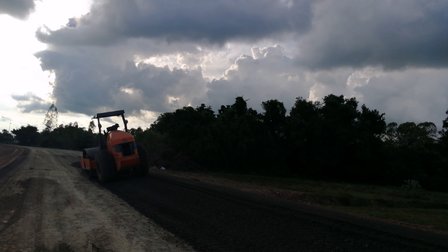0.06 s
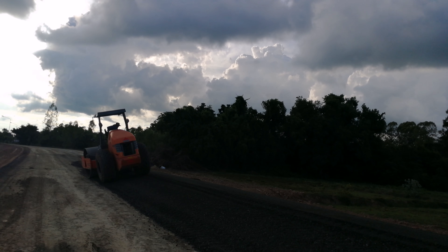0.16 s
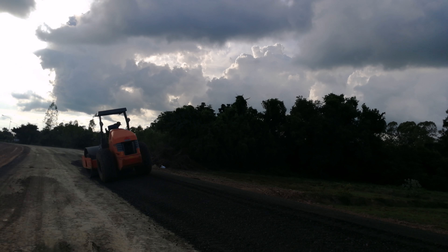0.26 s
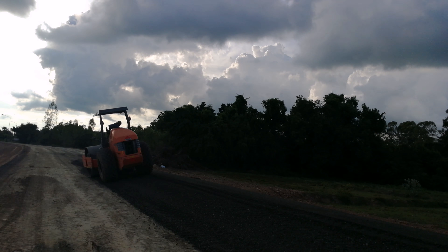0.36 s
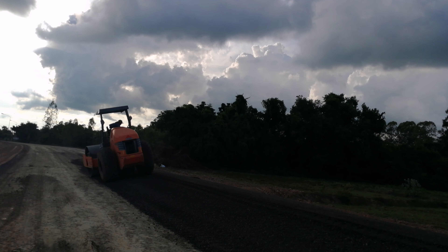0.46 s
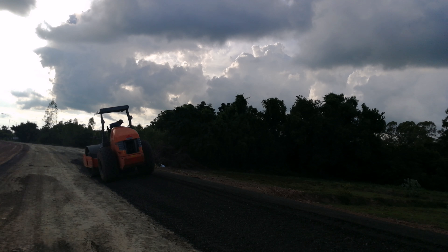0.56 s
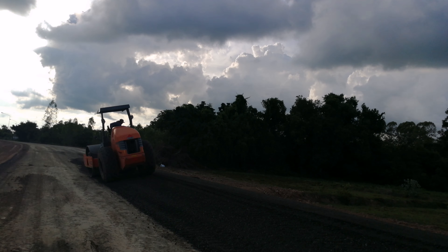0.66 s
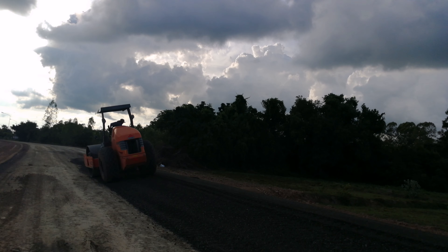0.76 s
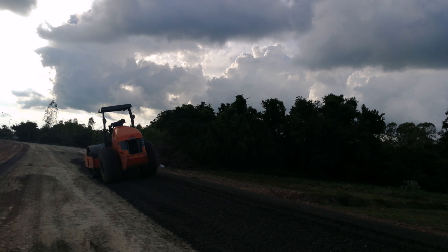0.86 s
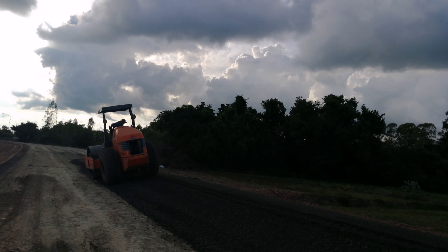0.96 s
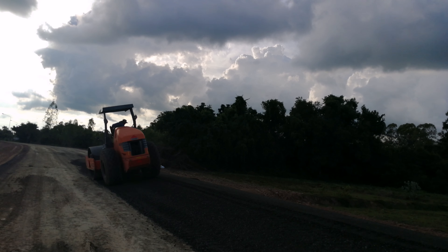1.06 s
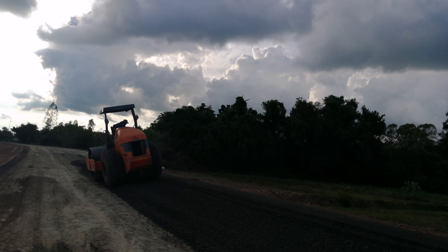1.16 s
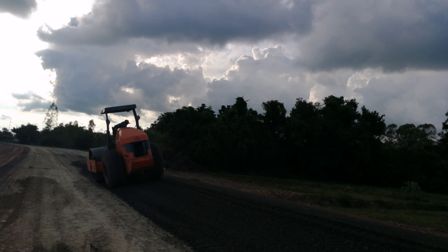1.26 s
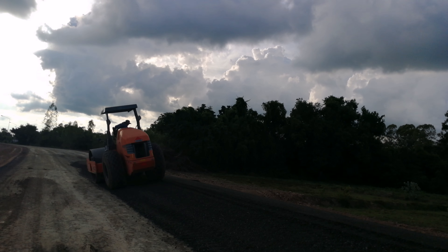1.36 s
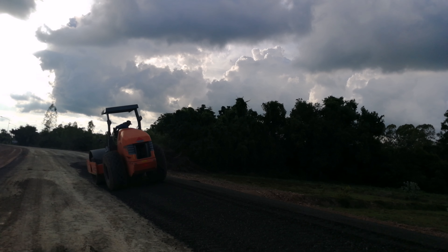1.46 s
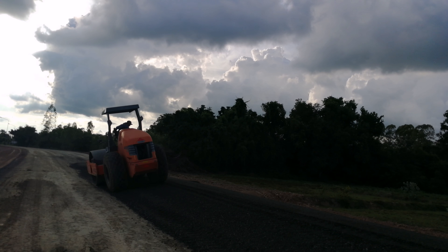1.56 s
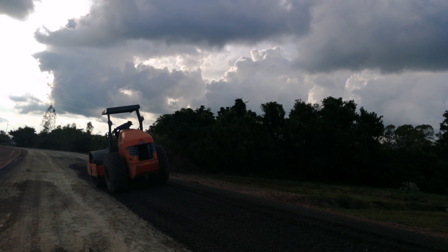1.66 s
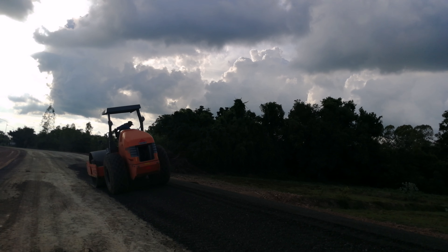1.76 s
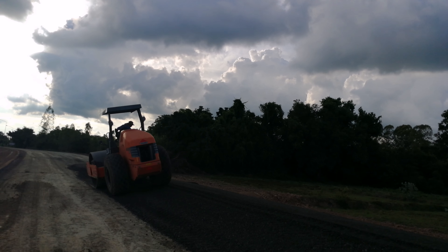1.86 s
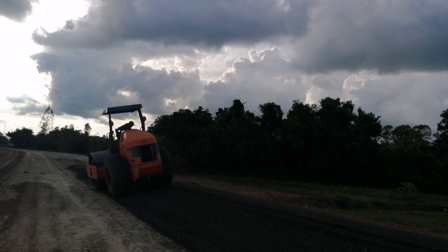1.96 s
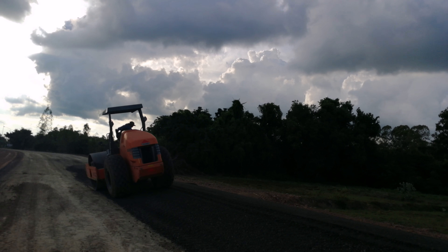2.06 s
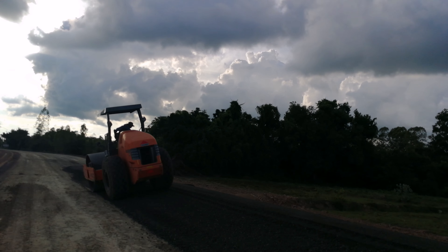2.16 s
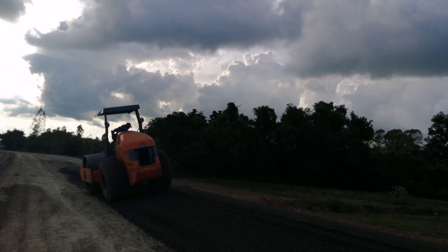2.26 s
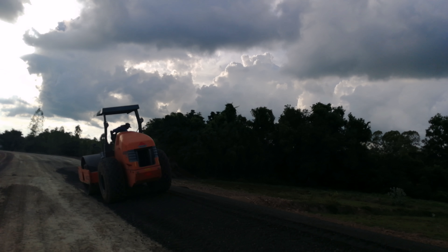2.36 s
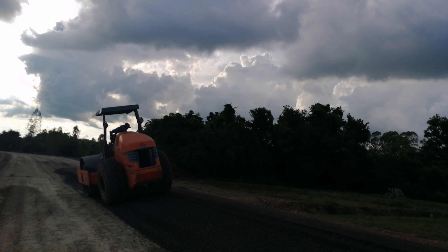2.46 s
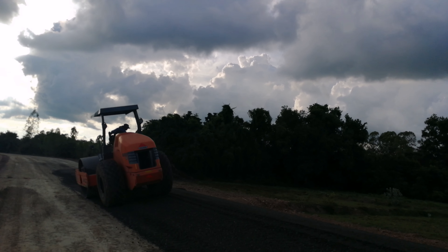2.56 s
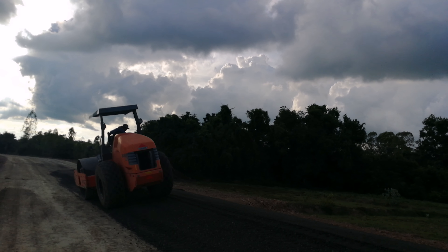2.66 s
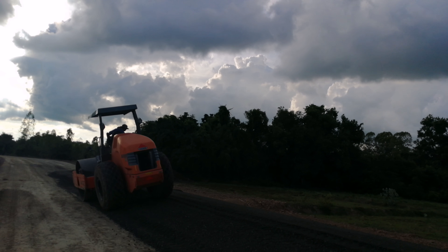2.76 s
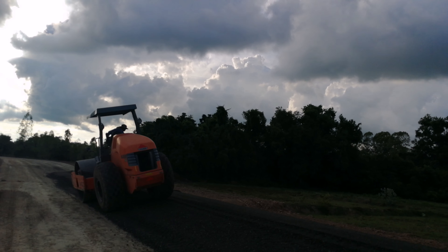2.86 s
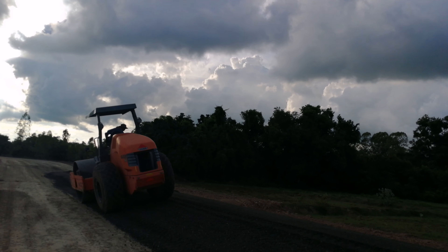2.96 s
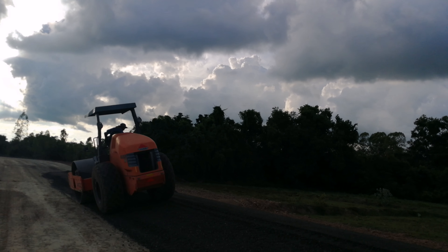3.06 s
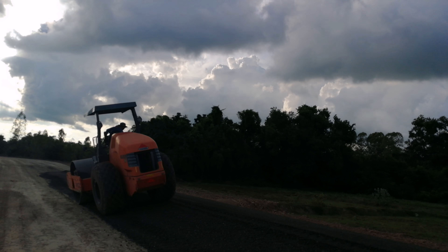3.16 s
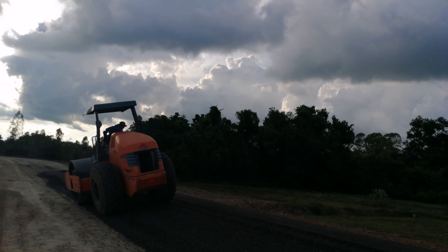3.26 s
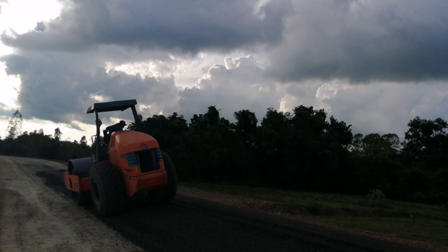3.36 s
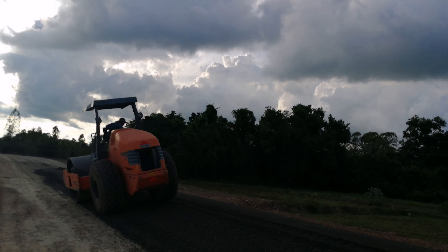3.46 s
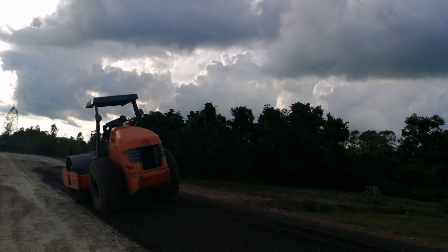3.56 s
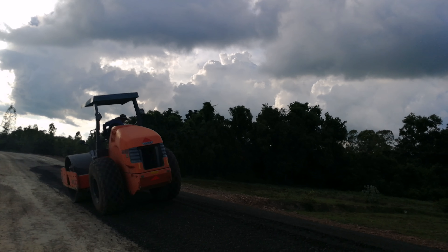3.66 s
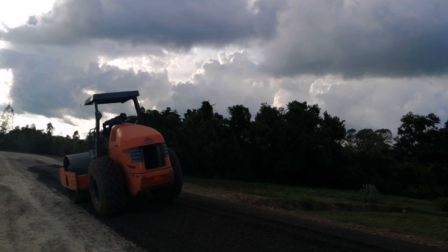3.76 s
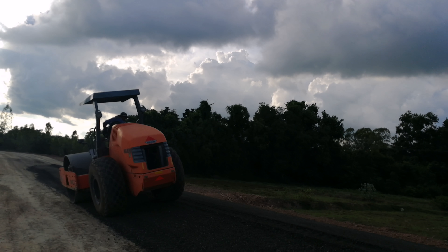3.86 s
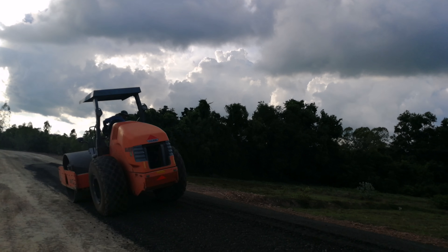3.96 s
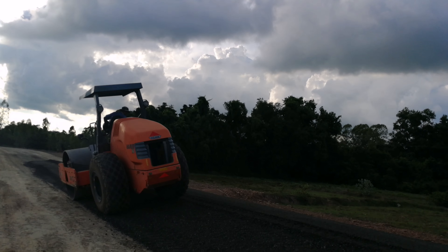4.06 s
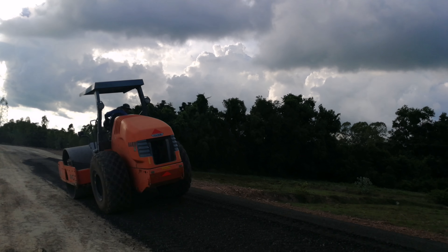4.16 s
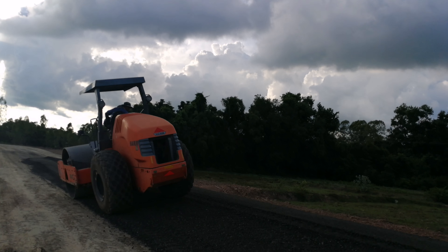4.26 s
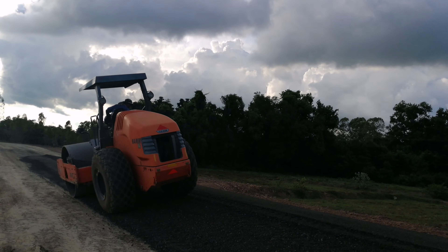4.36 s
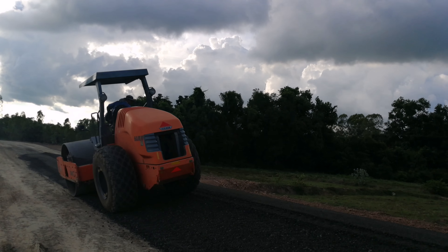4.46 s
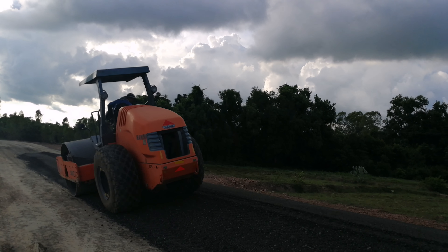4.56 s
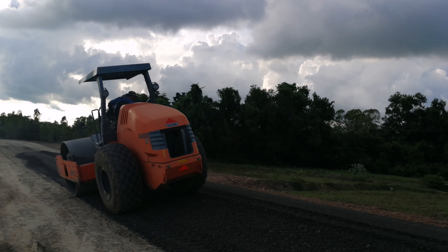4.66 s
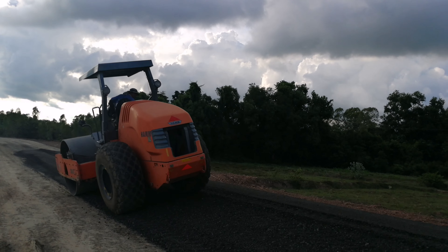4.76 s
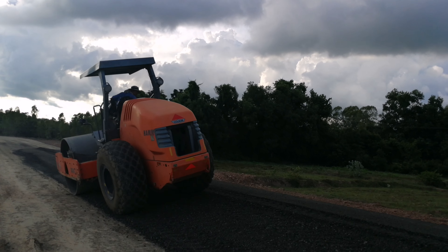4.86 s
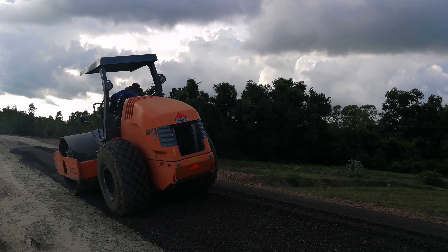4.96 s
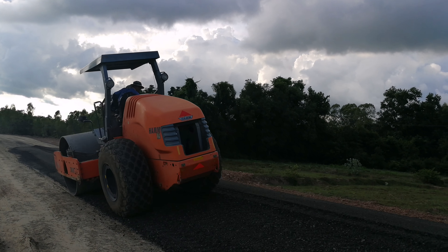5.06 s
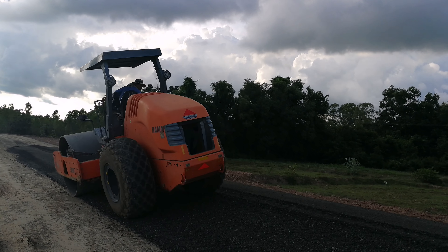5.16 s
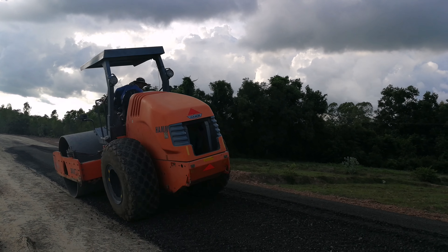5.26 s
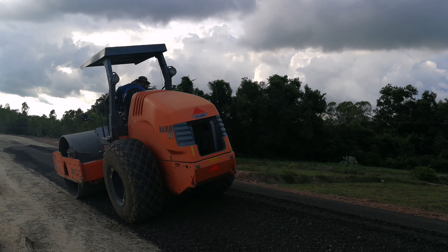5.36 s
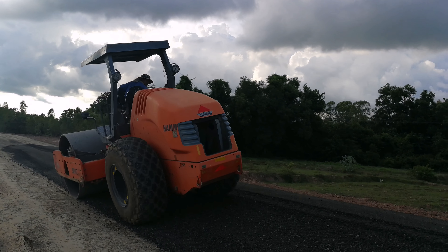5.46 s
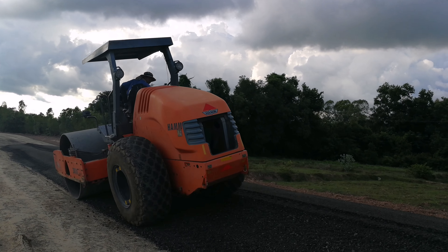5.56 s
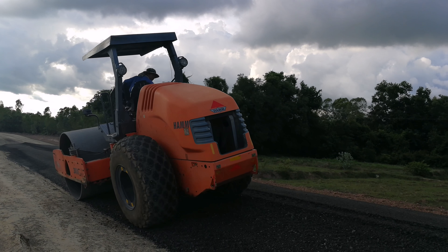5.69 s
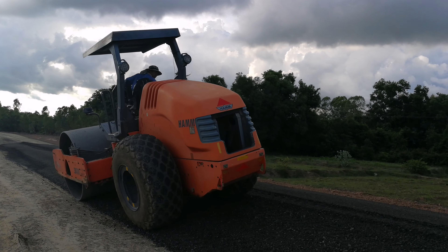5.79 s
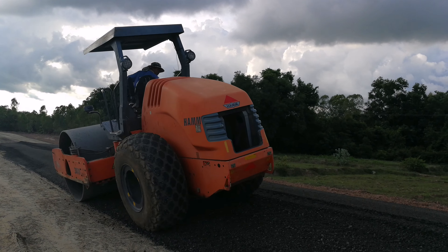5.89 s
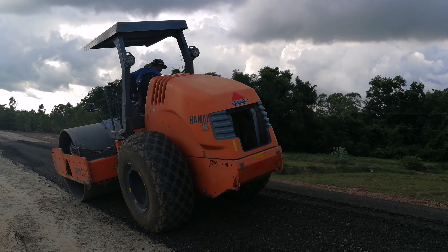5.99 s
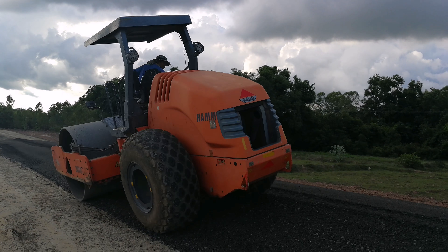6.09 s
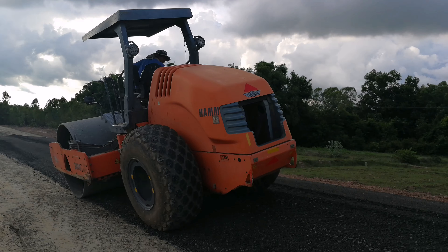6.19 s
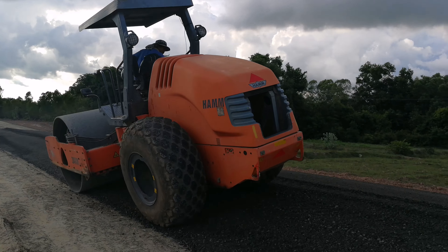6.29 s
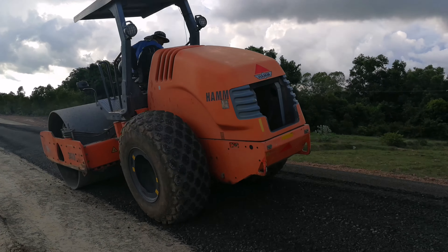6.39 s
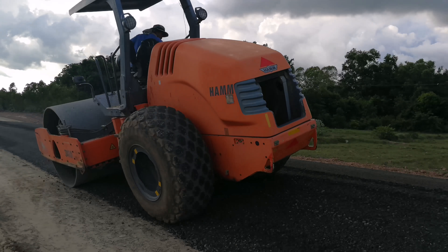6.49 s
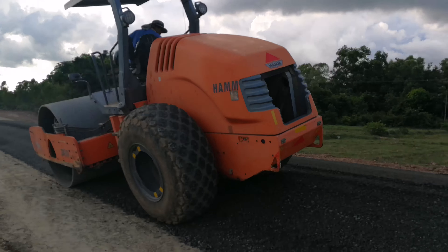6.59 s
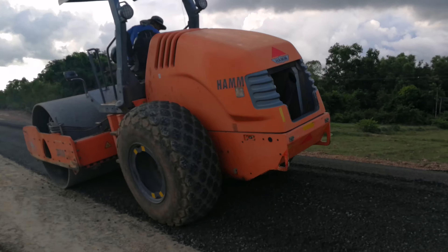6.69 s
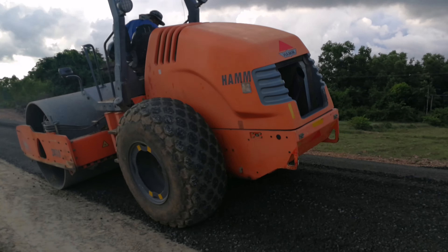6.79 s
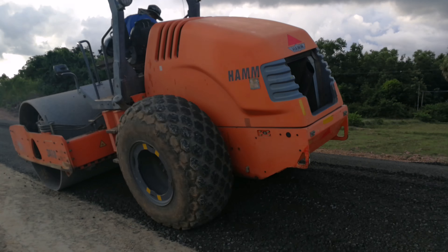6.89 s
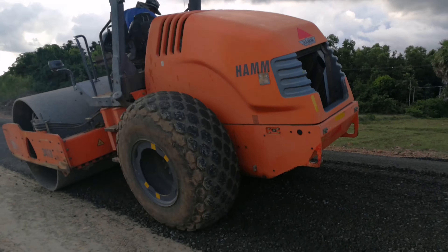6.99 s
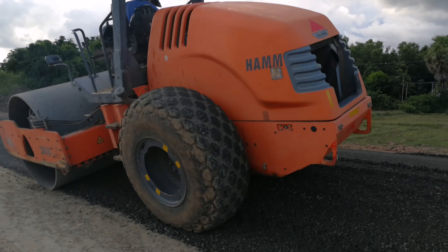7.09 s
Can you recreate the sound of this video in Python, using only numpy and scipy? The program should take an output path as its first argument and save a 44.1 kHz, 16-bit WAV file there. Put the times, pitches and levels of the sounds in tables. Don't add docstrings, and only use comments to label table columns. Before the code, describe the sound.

Steady low engine hum under broad, clattering fan noise, swelling gradually as a heavy roller approaches outdoors, with faint gritty jolts and panel buzzes.

```python
import sys
import numpy as np
from scipy import signal
from scipy.fft import rfft, irfft
from scipy.io import wavfile
from scipy.ndimage import uniform_filter1d

SR = 44100
rng = np.random.default_rng(int(sys.argv[2]) if len(sys.argv) > 2 else 0)


def ratio_of_db(decibels):
    return 10 ** (np.asarray(decibels, float) / 20)


def waveform_to_disk(signal):
    frames = np.transpose(np.atleast_2d(signal))
    scaled = np.clip(frames, -1, 1) * 32767
    samples = np.round(scaled).astype(np.int16)
    wavfile.write(sys.argv[1], SR, samples)


N = 314433
FRAME = 1024


def read(table, at):
    places, *columns = np.transpose(table)
    return np.array([np.interp(at, places, column) for column in columns])


def by_hz(table, hz):
    table = np.array(table, float)
    return read(np.c_[np.log(table[:, 0]), table[:, 1:]], np.log(hz + 1))


def unit(x):
    return x / np.sqrt(np.mean(np.abs(x) ** 2))


def walk(rate_hz):
    hold = int(SR / rate_hz)
    steps = np.repeat(rng.standard_normal(N // hold + 1), hold)
    return unit(uniform_filter1d(uniform_filter1d(steps, hold), hold)[:N])


def bump(t, at, length):
    return np.exp(-((t - at) / length) ** 2)


def resonance(hz, centre_hz, width_hz):
    return 1 / (1 + (2 * (hz[:, None] - centre_hz) / width_hz) ** 2)


def levels(t, rows):
    # start_s, gain_db
    approach = [(0, -1), (1, -0.2), (2, 1.5), (2.8, 2.5), (3.6, 4), (4.4, 5), (5.2, 7), (5.8, 7.5),
                (6.2, 9), (7.13, 9)]
    rise_db = read(approach, t)[0]
    return np.array([db + share * rise_db + wander_db * walk(rate_hz)
                     for db, share, wander_db, rate_hz in rows])


def engine(t):
    # level_db at the start, share of the approach (1 = all of it), wander_db, wander_rate_hz
    steady_tones = [
        (-34, 0.14, 0.67, 3.75),
        (-44.5, 1.0, 0.5, 5.1),
        (-44, -.1, 2, 5.1),
        (-51.5, 0, 3, 2.4),
        (-61.5, 2.03, 2.5, 4.99),
        (-43, 0.58, 0.7, 6.6),
    ]
    # peak_s, length_s, level_db
    tone_swells = [
        [(.1, .35, -2), (3.3, 0.16, 1.5), (3.75, .3, -1), (4.35, 0.14, 1.5), (5.2, 0.19, 2)],
        [(3.4, .5, 1), (4.95, .1, 3), (5.6, 0.49, -3), (6.3, .2, 0.5), (6.8, .15, -4)],
        [(2.6, .15, -9), (2.95, .15, 2), (4.1, .2, 5.5), (4.8, .2, 8), (5.9, .8, -9)],
        [(3.3, 1, -1)],
        [(4.9, .3, 4), (5.85, 0.18, 4.5), (6.3, 0.11, -6), (6.95, .3, 5.5)],
        [(.6, .8, 2.5), (1.65, .15, -5), (2.1, .15, 7.5), (3.4, 0.79, -8), (5.1, .2, 3.5), (5.35, 0.1, -1.5),
         (5.6, 0.16, 3.5), (6.35, .15, -2.5), (6.85, 0.2, 5)],
    ]
    # multiple of crank speed, level_db against the drone
    weak_orders = [(1, -40), (3, -62), (6, -28), (7, -31), (15, -21.5), (16, -30), (17, -24.5), (30, -38)]
    crank_hz, blade_hz = 38.8, 326.2
    crank = np.cumsum(crank_hz * (1 + 0.00091 * walk(3.105))) * 2 * np.pi / SR
    swells = [sum(db * bump(t, at, length) for at, length, db in rows) for rows in tone_swells]
    drone_db, firing_db, fifth_db, ninth_db, eighteenth_db, blade_db = levels(t, steady_tones) + swells

    tones = ratio_of_db(drone_db + 1.1 * walk(20)) * np.sin(4 * crank)
    tones = tones + ratio_of_db(firing_db + 3.0 * walk(14)) * np.sin(2 * crank)
    for order, db in [(5, fifth_db), (9, ninth_db), (18, eighteenth_db)]:
        tones = tones + ratio_of_db(db) * np.sin(order * crank)
    for order, db in weak_orders:
        wobble = 1.45 * walk(4)
        tones = tones + ratio_of_db(drone_db + db + 3.8 * walk(4.1)) * np.sin(round(order) * crank + wobble)

    blade_phase = np.cumsum(blade_hz * (1 + 0.00407 * walk(6))) * 2 * np.pi / SR
    blade = ratio_of_db(blade_db + 2.45 * walk(15)) * np.sin(blade_phase)
    return np.sqrt(2) * (tones + blade), crank


def roar(t, crank, shake_db):
    # pitch_hz, level_db per Hz
    colour = [(20, -25), (45, -5), (110, 2), (220, -3), (340, 4), (415, -6.5), (650, -3.5), (1500, -8.5),
              (3200, -7.5), (3900, -13.5), (7200, -17), (9600, -20.5), (11000, -26), (12700, -32.5),
              (15000, -36.5)]
    # pitch_hz, width_hz,
    # level_db against the roar
    smears = [(321.2, 40, -23), (655, 22, -19.5), (851, 50, -21.5), (980, 30, -18.5), (1040, 25, -27.5),
              (1643, 22, -24), (1956, 80, -20), (2958, 63, -20)]
    top_hz, roar_db = 15140, -28
    hz = np.fft.rfftfreq(N, 1 / SR)
    clatter = 1 / (1 + (1800 / (hz + 1)) ** 2)
    throb = ratio_of_db(0.43 * np.cos(2 * crank) + shake_db)
    steady = rng.standard_normal(N)
    throbbing = unit(throb * rng.standard_normal(N))
    mix = np.sqrt(1 - clatter) * rfft(steady) + np.sqrt(clatter) * rfft(throbbing)
    noise = unit(irfft(mix * ratio_of_db(by_hz(colour, hz)[0]) * (hz < top_hz), N))
    for pitch_hz, width_hz, db in smears:
        phase = 2 * np.pi * pitch_hz * t
        noise = noise + ratio_of_db(db) * (walk(width_hz) * np.cos(phase) + walk(width_hz) * np.sin(phase))
    return noise * ratio_of_db(roar_db)


def load_shake(t):
    # peak_s, swell_db, length_s
    crunches = [(0.545, -1, .04), (1.06, 1.5, 0.036), (2.002, 1, 0.045), (2.448, 1.5, 0.027),
                (4.074, 2, 0.064), (4.623, 1, 0.026), (4.91, 1, 0.018), (6.015, 3, 0.0092),
                (6.066, 1.5, 0.026), (6.553, -0.5, .012), (6.91, 4, 0.026)]
    shake_db = 0.19 * walk(8) + 0.66 * walk(21.98) + 0.5 * walk(50)
    return shake_db + sum(db * bump(t, at, length) for at, db, length in crunches)


def roar_swell(t, hz, s):
    # level_db at the start, share of the approach (1 = all of it), wander_db, wander_rate_hz
    parts = [
        (-4, 0.65, 0.8, 8),
        (1.15, 0, 0.6, 8),
        (-5.5, 1.2, -0.32, 5),
        (-4.5, .95, 0.4, 4),
    ]
    part_hz = [90, 280, 1200, 6000]
    bands = np.array([np.interp(s, t, db) for db in levels(t, parts)])
    patches = rng.standard_normal((len(hz), len(s)))
    patches = uniform_filter1d(uniform_filter1d(patches, size=5, axis=0), size=24, axis=1)
    return ratio_of_db(by_hz(np.c_[part_hz, bands], hz).T) * ratio_of_db(1.0 * unit(patches))


def bodywork(hz, s, near):
    # pitch_hz, width_hz, far_db, near_db
    panels = [(3700, 1070, 1.5, 0), (2403, 630, 6, 4.5), (2927, 290, 2.5, -13.5), (4560, 500, 3, 6),
              (7760, 1040, 6.5, -1.5), (9120, 400, 1.5, 3.5)]
    # peak_s, length_s, pitch_hz,
    # width_hz, level_db
    flares = [(0.01, 1.6, 304, 46, 4.5), (6.8, 0.9, 260, 38, 10), (6.05, .15, 250, 30, 6),
              (6.95, .3, 298, 25, 7), (5.3, .4, 830, 55, -3), (6.8, .15, 1110, 50, 5), (.7, 1, 1180, 60, -5),
              (6.4, .15, 290, 60, 5), (3.5, .8, 655, 25, 4), (2.7, .35, 9000, 8000, 1),
              (7.05, .15, 11000, 6000, 2), (4.33, 1.33, 660, 20.5, 8.5), (7.3, 0.47, 780, 33, 10),
              (0.01, 0.62, 1000, 230, 4), (1.52, 1.17, 962, 87, 11), (3.3, 0.46, 900, 62, 1),
              (4.2, 1.24, 996, 97, 7), (0.34, 1.1, 1650, 40, 11.5), (3.1, 0.93, 1650, 38, 7.5),
              (5.5, 1.7, 1540, 120, 4), (5.65, 0.61, 3400, 900, -2), (7.15, 1.1, 2930, 90, 17),
              (0.9, 1.27, 587, 71, -14), (0.78, 0.84, 1040, 48, 13.5), (7.5, 2.1, 843, 47, -8),
              (3, 7.2, 7530, 210, -8), (4.2, 0.84, 3700, 190, 0.5), (6.4, 0.67, 8200, 750, 2),
              (1.11, 0.037, 970, 120, 4), (1.13, 0.064, 750, 46, 7), (1.7, 0.056, 840, 69, 13.5),
             (4.68, 0.031, 635, 60, 9), (3.37, .15, 700, 90, 2), (1.2, 0.26, 240, 70, 5),
             (1.95, 0.13, 300, 90, 2), (3.28, 0.049, 200, 79, 11.5), (4.05, .2, 310, 90, -7),
             (5, 0.2, 280, 62, 4), (0.42, .05, 360, 180, 4), (0.095, 0.05, 835, 70, 11),
             (.55, 0.11, 1500, 70, 7), (0.075, 0.057, 940, 120, 5.5), (2.09, 0.1, 1300, 25, 13),
             (2.63, 0.94, 1645, 26, 0), (2.9, 0.041, 760, 43, 11), (6.7, .1, 1060, 43, 0),
             (6.45, 0.9, 370, 75, -5.5), (4.72, 0.049, 655, 36, 3), (7, .25, 680, 40, 5),
             (5.3, .3, 990, 27, 2.5), (6.05, 0.11, 1640, 52, 2), (9, 0.095, 470, 60, 12),
             (6.07, 0.073, 1500, 2000, 1.5), (6.91, 0.034, 1800, 2000, -0.5), (6.5, 0.33, 1070, 92, 3.5),
             (2.06, 0.51, 285, 25, 4), (6.44, 0.16, 230, 40, -10), (.4, 0.84, 2900, 380, 3.5),
             (5.35, 0.78, 1880, 130, 4.5), (6.6, 0.57, 2340, 140, 1.5), (0.28, 0.15, 430, 84, -10),
             (2.94, 0.25, 336, 33, 3.5)]
    gain = np.ones((len(hz), len(s)))
    for pitch_hz, width_hz, far_db, near_db in panels:
        panel_db = (1 - near) * far_db + near * near_db
        gain = gain * ratio_of_db(panel_db * resonance(hz, pitch_hz, width_hz))
    for at, length, pitch_hz, width_hz, db in flares:
        gain = gain * ratio_of_db(db * bump(s, at, length) * resonance(hz, pitch_hz, width_hz))
    return gain


def ground_bounce(hz, s, near):
    # pitch_hz, share reflected (0-1), extra lag_rad, share from low parts (0-1)
    bounce = [(150, 0.7, 1.03, 0.21), (343, 1, 1.7, 0), (524, 0.73, 0.48, 0.11), (970, 0.56, 0.01, 0.29),
              (1490, 0.3, 0.71, 0.33), (1910, 0.42, 0.83, 0.2), (2320, 0.04, 0.55, 0),
              (4480, 0.19, 0, 0.09), (9000, 0.43, 0, 0)]
    strength = np.clip(0.8 - near, 0, 1)
    spacing_hz = 594.6 - 32.8 * s
    share, lag, low_share = by_hz(bounce, hz)[:, :, None]
    share = np.clip(share * strength, 0, 0.97)
    turns = hz[:, None] / spacing_hz
    comb = (1 - share * np.exp(-1j * (2 * np.pi * turns + lag))) / np.sqrt(1 + share ** 2)
    low_share = np.clip(low_share * strength, 0, 0.9)
    return comb * (1 - low_share * np.exp(-1j * np.pi * turns)) / np.sqrt(1 + low_share ** 2)


def microphone_ports(shared, apart, hz, near):
    # left minus right level_db, left lead_rad, likeness (0-1)
    ports = [(30, 0, .1, .985, 0, 0, .985), (60, 0, .1, .995, 0, 0, .995),
             (172, 0, .36, .996, 0, .05, .995), (300, -.3, .55, .985, 0, .1, .975),
             (387, -1, .6, .94, 0, 0, .88), (430, 0, 1.3, .88, 0, .5, .8), (516, 5, 2.1, .97, 3, .7, .83),
             (600, 10.5, 1.6, .96, 4.5, .2, .85), (650, 11.5, 1, .96, 3.5, .2, .88),
             (775, 8, .7, .97, 1.5, .7, .82), (860, 5, .8, .95, 1.5, .6, .72), (990, 2, 1, .88, 4, .2, .8),
             (1160, 3.5, .6, .92, .5, .3, .9), (1380, 0, .8, .88, 0, .1, .87),
             (1640, -6, .6, .91, 0, 0, .92), (1940, -9, .6, .66, -4, -.3, .84),
             (2240, -14, 2.4, .8, -11, .7, .3), (2580, -8.5, 2.8, .9, -7, 1.6, .42),
             (2990, -12, 4, .8, 1, .8, .5), (3790, 3, 4.6, .75, -6, 0, .35),
             (4130, 3, 4.5, .7, -9, 0, .4), (4480, -1, 5.3, .8, -7, 2, .55),
                 (5000, 0, 6.25, .85, -1, 2.5, .45), (5700, -3, 7, .68, 0, 2.6, .3),
                 (6550, -3, 8.3, .68, 1, 2.6, .35), (6950, -2, 9.1, .8, 0, 2.6, .3),
                 (7240, 0, 9.42, .99, 1, 2.4, .3), (7550, -3, 10, .78, 1, 2.6, .3),
                 (8100, -4.5, 11, .7, 0, 3, .4), (8600, 0, 12.5, .8, 1, 4.5, .35),
                 (9300, 5, 13.6, .55, 3, 4.8, .25), (10000, 6, 13.7, .3, 4, 5, .2),
                 (10350, 13, 14, .2, 5, 5, .25), (10900, 16, 14.3, .2, 5, 5.5, .3),
                 (11600, 7, 14.6, .25, 6, 6.5, .2), (12100, 2, 15.6, .38, 4, 7.5, .1),
                 (12750, 2, 15.7, .2, 2, 7, .05), (13200, 3, 16.3, .12, 1, 8, .25),
                 (14100, 4, 18.3, .25, 0, 7.6, .55), (14900, 5, 18.8, .3, 0, 7.5, .1)]
    far_port, near_port = by_hz(ports, hz).reshape(2, 3, -1, 1)
    pan_db, lead, like = (1 - near) * far_port + near * near_port
    like = np.clip(like, 0, 1)
    left = shared * ratio_of_db(pan_db / 2)
    right = like * shared * np.exp(-1j * lead) + np.sqrt(1 - like ** 2) * apart
    right = right * ratio_of_db(-pan_db / 2)
    return np.array([left, right]) / np.sqrt(np.cosh(pan_db * np.log(10) / 20))


def scene():
    t = np.arange(N) / SR
    tones, crank = engine(t)
    shake_db = load_shake(t)
    sources = [roar(t, crank, shake_db), roar(t, crank, shake_db), tones]
    hz, s, (shared, apart, drone) = signal.stft(sources, SR, nperseg=FRAME, noverlap=3 * FRAME // 4)

    turn_from_s, turn_length_s, turn_curve = 1.6, 5.27, 2.77
    near = np.clip((s - turn_from_s) / turn_length_s, 0, 1) ** turn_curve
    comb = ground_bounce(hz, s, near)
    path = roar_swell(t, hz, s) * bodywork(hz, s, near) * comb
    drone = drone * np.where(hz[:, None] < 450, 1, comb)
    both = microphone_ports(shared * path + drone, apart * path, hz, near)
    return signal.istft(both, SR, nperseg=FRAME, noverlap=3 * FRAME // 4)[1][:, :N]


def low_pass(x):
    return signal.sosfilt(signal.butter(12, 15140, fs=SR, output="sos"), x)


def record(dry):
    mix = np.tanh(1.486 * dry) / 1.732
    return low_pass(mix)


dry = scene()
out = record(dry)
waveform_to_disk(out)
```